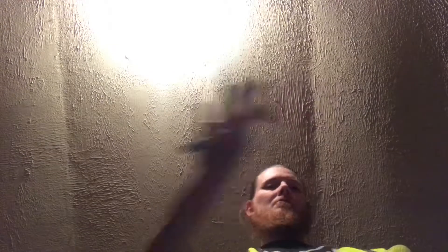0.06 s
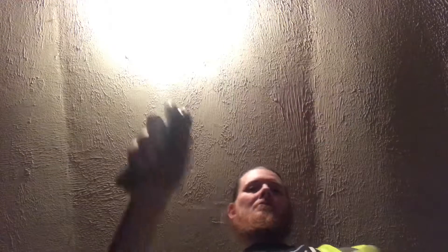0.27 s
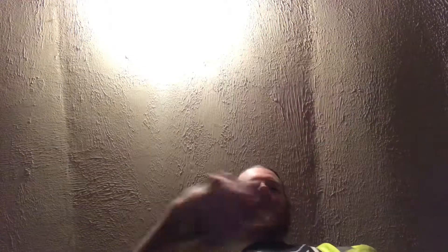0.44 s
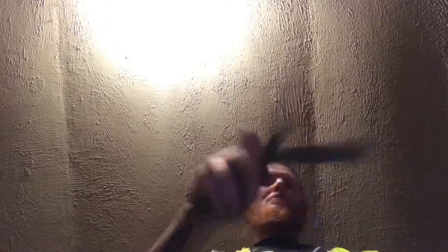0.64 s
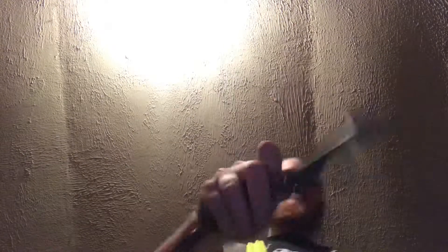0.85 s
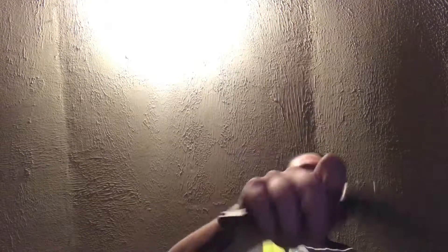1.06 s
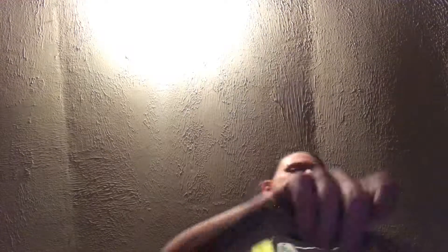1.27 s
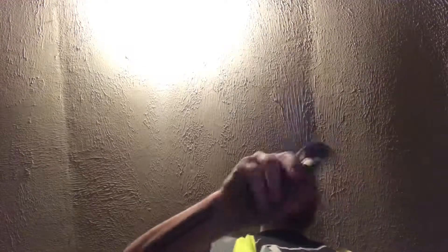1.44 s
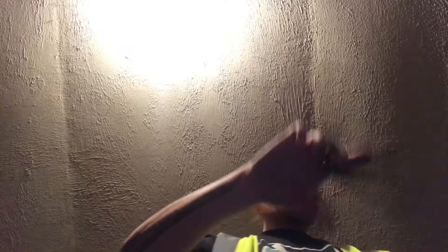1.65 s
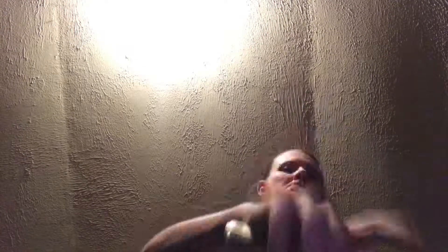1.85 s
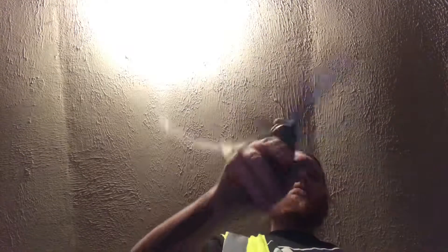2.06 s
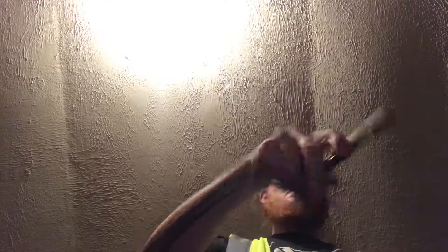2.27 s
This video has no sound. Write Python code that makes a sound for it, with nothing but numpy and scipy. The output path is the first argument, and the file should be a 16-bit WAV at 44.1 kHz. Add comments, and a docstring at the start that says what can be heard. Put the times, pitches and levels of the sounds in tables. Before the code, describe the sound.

A butterfly knife flipped in one hand, with sharp metal clacks and a quick rattle.

```python
"""Light metal ticks, sharp clacks and one quick rattle: a butterfly knife flipped in one hand,
close by in a small, quiet room. The handles strike each other, the loose pivots tick and scrape
between blows, and the thin steel pings and rings on faintly. Two catches thud in the palm and
a sleeve brushes once. Behind it all: short wall reflections, low rumble, thin hiss."""
import sys
import numpy as np
from scipy import signal
from scipy.fft import rfft, irfft
from scipy.io import wavfile
from scipy.ndimage import uniform_filter1d

SR = 44100
rng = np.random.default_rng(int(sys.argv[2]) if len(sys.argv) > 2 else 0)


def materialize(psi):
    """Save the field psi as 16-bit PCM at rate SR to the path in sys.argv[1].

    A 1-D psi becomes a single channel; in a 2-D psi each row is a channel.
    """
    bounded = np.clip(np.atleast_2d(psi).T, -1, 1)
    quanta = np.round(bounded * 32767).astype(np.int16)
    wavfile.write(sys.argv[1], SR, quanta)


N = 105840
TAPS = 4096
HZ = np.fft.rfftfreq(TAPS, 1 / SR)
TOUCH_S, TICK_T60_S = 0.00045, 0.018


def handle_clacks(t60_s=0.012, body_hz=2700, treble_hz=9800, peak_db=11, peak_width_hz=650):
    """Handles collide: resonances set by the contact point, plus bending. Returns direct, room feed."""
    # start_s, energy_db, contact_s, body_db, treble_db, ring_db, resonances_hz (strongest first)
    clacks = [ (0.1809, -14, 0.00044, -1.5, -3, -26, [7600]),
              (0.2403, .5, 0.0013, -7, -2.5, -21, [7900, 3950, 9130, 2610]),
              (0.2619, 1.5, 0.00065, -9, -4, -13, [8700, 2930, 13600]),
              (0.2666, -1, 0.0024, -6, -6, -26, [7750, 8800, 6680, 4000]),
              (0.2712, -2.5, 0.00083, -0.5, -1, -30, [6850, 5760, 2370]),
              (0.2776, -7, .002, -2.5, -5, -21, [3440]), (0.282, -4, .0012, -4, -2, -26, [2800, 7600]),
              (.2845, -6.5, 0.0014, 0.5, -2, -24, [5640]), (.2865, -6, 0.0013, -5.5, 1, -30, [8700, 2700]),
              (.2893, -5.5, 0.0037, -0.5, 1, -25, [2630, 6300]),
              (.2938, -3.5, 0.0015, -0.5, 1.5, -32, [2780, 12840]),
              (.296, -3.5, 0.0024, -2, -1.5, -21, [12300, 2700]), (.3, -10.5, 0.0062, 3, -4, -24, [2750]),
              (.4348, -19.5, 0.0013, -2, -8, -19, [7150]),
              (.4995, -13.5, 0.00047, -20, -9, -38, [8000, 11300]),
              (0.7805, -5, .0006, 3.5, 4, -14, [7760, 11560, 9700, 12900]),
              (0.7995, -11.5, 0.00064, 2, 3.5, -14, [2810]),
              (0.8061, -17, 0.0013, -7, -20, -34, [4100, 8100]),
              (.981, -11.5, .00076, 2, 1, -15.5, [8700, 11750]),
              (1.2816, -2, .001, 0.5, 1.5, -22, [5420, 12400, 7400, 9370]),
              (1.3089, -7, .001, 2, -2.5, -22, [6700, 3430]),
              (1.3207, -14, 0.0014, 0.5, -6, -30, [4000, 8100]), (1.3364, -21.5, .00063, 6, 4, -19, [3600]),
              (1.4837, -2.5, 0.00075, -1, 3.5, -11, [5340, 6800, 11800]),
              (1.6792, -8, 0.00074, -2, 4, -13, [6900, 12500]),
              (1.926, 1, 0.0014, -2.5, 1, -15, [8930, 12450, 7080, 5850]),
              (2.148, -4, 0.00087, -0.5, 5, -19.5, [6030, 5440, 9420, 8140])]
    # clack spectrum: freq_hz, density_db
    clack_colour = [(100, -10.5), (400, -11.5), (650, -14.5), (900, -13), (1400, -4), (1950, -5),
                    (2400, -0.5), (2950, -2.5), (3600, -1), (4400, -2.5), (5500, -0.5), (8000, 0),
                    (10300, -0.5), (13500, -1), (14600, -8), (15500, -9)]
    # handle bending modes: pitch_hz, level_db, t60_s
    bending_modes = [(1478, -11, 0.062), (2283, 4, 0.022), (3320, -5.5, 0.019)]
    direct, room_feed = np.zeros((2, N))
    for start_s, energy_db, contact_s, body_db, treble_db, ring_db, resonances_hz in clacks:
        colour_db = curve(clack_colour, HZ) + body_db * (1 - above(body_hz))
        colour_db += treble_db * above(treble_hz)
        humps = [0.85 ** rank / (1 + (2 * (HZ - hz) / peak_width_hz) ** 4)
                 for rank, hz in enumerate(resonances_hz)]
        peaks_db = peak_db * np.max(humps, axis=0)
        add(direct, start_s, amp(energy_db) * contact(contact_s, t60_s, colour_db + peaks_db))
        add(direct, start_s, amp(energy_db + ring_db) * unit(ring(bending_modes)))
        # the room hears all sides of the knife: more even level and colour
        diffuse = contact(contact_s, t60_s, colour_db + 0.26 * peaks_db)
        add(room_feed, start_s, amp(0.73 * energy_db - 2.5) * diffuse)
    return direct, room_feed


def contact(contact_s, t60_s, colour_db, rise_s=0.00028, sag_db=-6.5):
    """Fast-dying burst of micro-impacts through a causal body filter; unit energy."""
    t = np.arange(TAPS) / SR
    decay_db = sag_db * np.minimum(t / contact_s, 1) - 60 * np.maximum(t - contact_s, 0) / t60_s
    envelope = np.minimum(t / rise_s, 1) * amp(decay_db)
    burst = rfft(np.roll(envelope * rng.standard_normal(TAPS), 22))
    burst /= np.sqrt(uniform_filter1d(abs(burst) ** 2, size=130) + 1e-12)  # whiten
    log_gain = np.log(amp(np.r_[colour_db, colour_db[-2:0:-1]]))
    body = np.exp(np.conj(signal.hilbert(log_gain)))[:len(HZ)]  # minimum phase
    return unit(irfft(burst * body)[16:-256])


def ring(modes, rise_s=0.00059):
    """Modes struck together, each with its own decay."""
    t = np.arange(SR // 2) / SR
    waves = sum(amp(level_db - 60 * t / t60_s) * np.sin(2 * np.pi * (pitch_hz * t + rng.random()))
                for pitch_hz, level_db, t60_s in modes)
    return np.minimum(t / rise_s, 1) * waves


def pivots(scrape_t60_s=0.052, fidgets_per_s=20, fidget_db=-48, spread_db=2):
    """Play in the joints: ticks, short scrapes, tiny random movements."""
    # start_s, energy_db, bright_db
    ticks = [(.002, -20, -11), (0.017, -19, 12), (0.0195, -23.5, 3), (0.0238, -24, -6),
             (0.0488, -24.5, -12.5), (.085, -31, -10), (0.169, -25.5, 31), (0.3438, -29, -7),
             (0.4965, -25, 6), (0.836, -22.5, 1), (1.404, -28, -1), (1.5453, -20.5, 10), (1.733, -25.5, -3),
             (1.7724, -30, -16), (1.9566, -27.5, -8), (2.087, -28.5, 2), (2.355, -29.5, -8)]
    # metal sliding on metal: start_s, contact_s, energy_db, bright_db
    scrapes = [(0.201, 0.011, -20, 7), (0.496, 0.024, -32, -6), (0.85, 0.012, -27, 4),
               (1.408, 0.008, -32, 5), (1.504, .003, -23.5, -2)]
    out = np.zeros(N)
    for start_s, energy_db, bright_db in ticks:
        add(out, start_s, amp(energy_db) * tick(bright_db))
    for start_s, contact_s, energy_db, bright_db in scrapes:
        add(out, start_s, amp(energy_db) * tick(bright_db, contact_s, scrape_t60_s))
    onsets = rng.random(N) < fidgets_per_s / SR
    fidgets = onsets * amp(fidget_db + spread_db * rng.standard_normal(N))
    return out + signal.oaconvolve(fidgets, tick(bright_db=-4, contact_s=0.0017))[:N]


def tick(bright_db, contact_s=TOUCH_S, t60_s=TICK_T60_S):
    """Light touch of metal on metal."""
    # tick spectrum: freq_hz, density_db
    tick_colour = [(200, -19.5), (800, -10), (1500, -7.5), (3000, -3), (7000, -0.5), (12500, -2),
                   (15500, -2.5)]
    return contact(contact_s, t60_s, curve(tick_colour, HZ) + bright_db * above(corner_hz=5850))


def steel_ring(low_below_hz=5200):
    """Jolts leave the thin steel ringing faintly."""
    # free modes of the steel: pitch_hz, level_db, t60_s
    steel_modes = [(4770, -6, 0.15), (5677, 4, 0.25), (7600, -32, 0.13), (11400, -22, .09),
                   (11480, 4, 0.092), (12900, -17, .08)]
    # start_s, level_db, low_mode_db
    jolts = [(.002, -53.5, -10), (0.202, -56.5, -14), (0.242, -59, 5), (0.778, -61, 14), (.8363, -58, 0),
             (1.0132, -54.5, 3), (1.2823, -54, -3), (1.412, -63.5, -14), (1.5446, -55.5, 0),
             (1.924, -58.5, -12), (2.148, -60, 12)]
    out = np.zeros(N)
    for start_s, level_db, low_mode_db in jolts:
        modes = [(pitch_hz, level_db + mode_db + low_mode_db * (pitch_hz < low_below_hz), t60_s)
                 for pitch_hz, mode_db, t60_s in steel_modes]
        add(out, start_s, ring(modes))
    return out


def loose_part_pings():
    """A small loose part ticks and rings briefly at one high pitch."""
    # start_s, level_db, pitch_hz, t60_s, tick_energy_db
    pings = [(.2015, -36, 14380, 0.055, -22), (0.511, -26, 11490, 0.042, -9),
             (1.0132, -24.5, 11500, 0.038, -16), (1.546, -53, 11490, 0.055, -29)]
    # onset tick spectrum: freq_hz, density_db
    onset_colour = [(1000, -29), (3500, -17.5), (4500, -5), (9500, -13.5), (11000, -15), (11900, 13),
                    (12800, -9), (15500, -11)]
    out = np.zeros(N)
    for start_s, level_db, pitch_hz, t60_s, tick_energy_db in pings:
        add(out, start_s, ring([(pitch_hz, level_db, t60_s)]))
        add(out, start_s, amp(tick_energy_db) * contact(TOUCH_S, TICK_T60_S, curve(onset_colour, HZ)))
    return out


def palm_thuds(t60_s=0.0086):
    """The palm stops the handle with a dead thud."""
    # start_s, energy_db
    catches = [(1.4838, -26.5), (1.926, -21)]
    # thud spectrum: freq_hz, density_db
    thud_colour = [(50, -20), (170, -0.5), (750, 1), (2500, -43)]
    out = np.zeros(N)
    for start_s, energy_db in catches:
        add(out, start_s, amp(energy_db) * contact(TOUCH_S, t60_s, curve(thud_colour, HZ)))
    return out


def sleeve(centre_s=1.136, width_s=0.041, level_db=-60):
    """Cloth noise swells and fades with the swing of the arm."""
    # cloth spectrum: freq_hz, density_db
    cloth_colour = [(120, -16), (220, -15), (285, 6), (380, -5), (600, -9), (1200, -21), (8000, -27),
                    (13000, -23), (16000, -29)]
    gain = amp(curve(cloth_colour, np.fft.rfftfreq(N, 1 / SR)))
    cloth = irfft(rfft(rng.standard_normal(N)) * gain, N)
    swing = np.exp(-((np.arange(N) / SR - centre_s) / width_s) ** 2)
    return amp(level_db) * np.sqrt(N) * unit(cloth) * swing


def reflections(feed, gain_db=-15.5, delay_s=0.002, build_s=0.0038):
    """Short diffuse tail from nearby walls; treble dies first."""
    # freq_hz, t60_s
    room_decay = [(200, 0.33), (1500, 0.12), (5000, 0.14), (10000, 0.12), (16000, 0.043)]
    hz, t, spectra = signal.stft(rng.standard_normal(SR // 2), SR, nperseg=256)
    decay = amp(-60 * t / curve(room_decay, hz)[:, None])
    tail = signal.istft(spectra * decay, SR, nperseg=256)[1]
    tail *= np.clip((np.arange(len(tail)) / SR - delay_s) / build_s, 0, 1)
    return amp(gain_db) * signal.fftconvolve(feed, unit(tail))[:N]


def room_noise(rms_db=-60, patch_db=1):
    """Low rumble and thin hiss, slightly uneven in time and frequency."""
    # noise spectrum: freq_hz, density_db
    noise_colour = [(15, -53), (25, -1.5), (185, -1), (354, -9.5), (560, -13.5), (775, -17.5), (1290, -19),
                    (2110, -24), (2910, -22), (4610, -27.5), (5000, -24.5), (10700, -32.5), (12200, -27.5),
                    (14800, -30), (16000, -56)]
    hz, _, spectra = signal.stft(rng.standard_normal(N), SR, nperseg=2048, noverlap=1536)
    patches = uniform_filter1d(rng.standard_normal(spectra.shape), size=12, axis=0)
    patches = uniform_filter1d(patches, size=8, axis=1)
    spectra *= amp(curve(noise_colour, hz)[:, None] + patch_db * patches / patches.std())
    noise = signal.istft(spectra, SR, nperseg=2048, noverlap=1536)[1][:N]
    return amp(rms_db) * np.sqrt(N) * unit(noise)


def amp(db):
    """Decibels to gain."""
    return 10 ** (np.asarray(db) / 20)


def unit(x):
    """Scale to unit energy."""
    return x / np.sqrt(np.sum(x ** 2) + 1e-20)


def curve(points, hz):
    """Interpolate a table over log frequency."""
    freq_hz, values = np.transpose(points)
    return np.interp(np.log(hz + 1), np.log(freq_hz + 1), values)


def above(corner_hz):
    """Smooth 0-to-1 step over frequency."""
    return HZ ** 6 / (HZ ** 6 + corner_hz ** 6)


def add(mix, start_s, sound):
    """Mix a sound in at start_s."""
    part = mix[round(start_s * SR):][:len(sound)]
    part += sound[:len(part)]


def scene():
    """Knife, hand, sleeve and room in mono; only the metal feeds the reflections."""
    clacks, room_feed = handle_clacks()
    small_metal = pivots() + steel_ring() + loose_part_pings()
    direct = clacks + small_metal + palm_thuds() + sleeve()
    return (direct + reflections(room_feed + small_metal) + room_noise())[None]


def record(dry, cutoff_hz=15950):
    """Steep low-pass band limit."""
    lowpass = signal.firwin(255, cutoff_hz, window=("kaiser", 8), fs=SR)
    return signal.oaconvolve(dry, lowpass[None], "same")


dry = scene()
out = record(dry)
materialize(out)
```